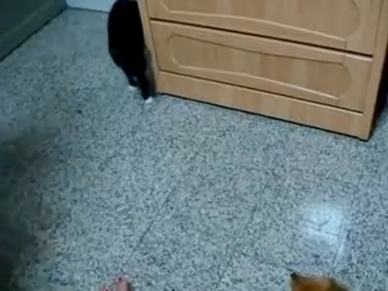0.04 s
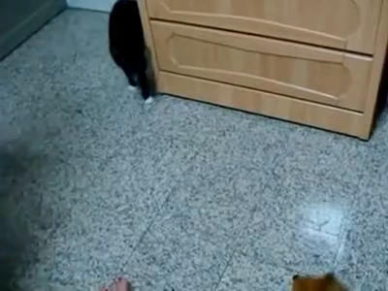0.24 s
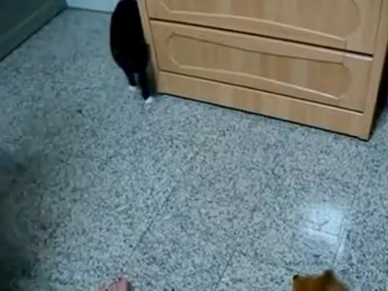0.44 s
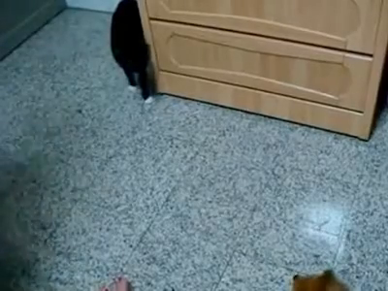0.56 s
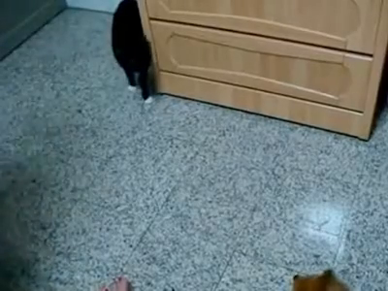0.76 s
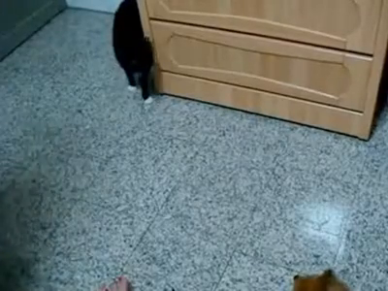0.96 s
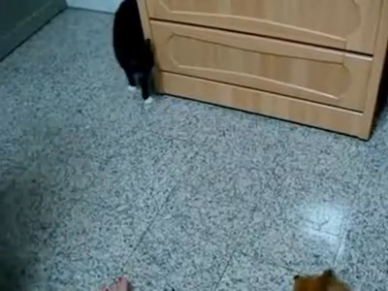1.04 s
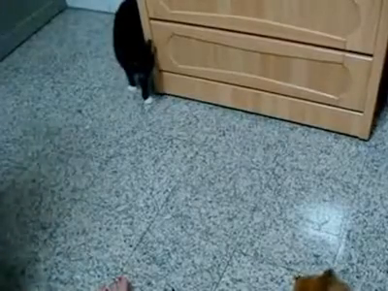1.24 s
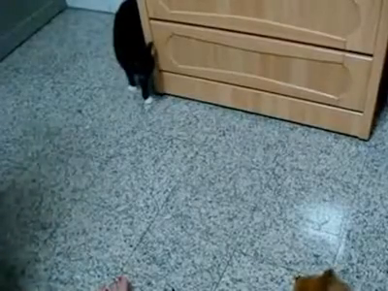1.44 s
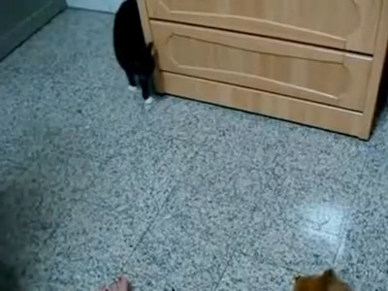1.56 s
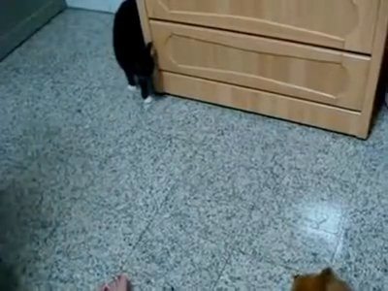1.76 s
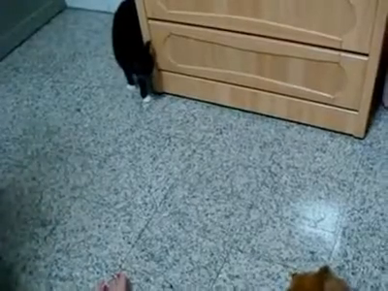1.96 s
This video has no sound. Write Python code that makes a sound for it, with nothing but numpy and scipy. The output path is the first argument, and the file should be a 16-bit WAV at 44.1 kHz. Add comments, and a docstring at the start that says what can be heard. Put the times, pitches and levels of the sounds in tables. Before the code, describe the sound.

One sharp, raspy bark from a small dog indoors, followed by two faint clicks.

```python
"""Dog bark in a stone-floored room

A small dog barks once, close by: the pitch arches up, the voice breaks into a rasp as the mouth
closes, its breath pushes on the microphone and the room rings. An earlier bark is dying away at
the start. Two dry handling clicks ring a small casing, over soft room noise and a low hum."""
import sys
import numpy as np
from scipy import signal
from scipy.fft import rfft, irfft
from scipy.io import wavfile
from scipy.ndimage import uniform_filter1d

SR = 44100
rng = np.random.default_rng(int(sys.argv[2]) if len(sys.argv) > 2 else 0)


def dump_mix(stems):
    """Bounce the given channels to the path in sys.argv[1] as a 16-bit WAV at rate SR."""
    frames = np.atleast_2d(stems).T  # one column per channel
    limited = np.clip(frames, -1, 1)  # hard clip at full scale
    pcm = np.round(limited * 32767).astype(np.int16)
    wavfile.write(sys.argv[1], SR, pcm)


N = 88200
T = np.arange(N) / SR
BIN_HZ = np.fft.rfftfreq(N, 1 / SR)


def amp(db):
    return 10 ** (np.asarray(db) / 20)


def unit(x):
    """Scale to rms 1."""
    return x / np.sqrt(np.mean(x ** 2) + 1e-20)


def steady(x):
    """Hold the 5 ms rms at 1."""
    return x / np.sqrt(abs(uniform_filter1d(x ** 2, 220)) + 1e-12)


def curve(rows, column=1):
    """Table column, linear in time."""
    rows = np.array(rows)
    return np.interp(T, rows[:, 0], rows[:, column])


def at_hz(points, hz):
    """Table value on a log-frequency axis."""
    knots_hz, values = np.transpose(points)
    return np.interp(np.log(hz + 1), np.log(knots_hz + 1), values)


def colour(x, spectrum):
    """Minimum-phase filter with the given spectrum."""
    log_gain = np.log(amp(at_hz(spectrum, abs(np.fft.fftfreq(8192, 1 / SR)))))
    response = np.exp(np.conj(signal.hilbert(log_gain)))
    taps = np.fft.ifft(response).real[:2048]
    return signal.fftconvolve(x, taps)[:N]


def noise(spectrum):
    """Shaped noise, rms 1."""
    return unit(irfft(rfft(rng.standard_normal(N)) * amp(at_hz(spectrum, BIN_HZ)), N))


def wander(cutoff_hz):
    """Low-passed random motion, rms 1."""
    return unit(irfft(rfft(rng.standard_normal(N)) / (1 + (BIN_HZ / cutoff_hz) ** 2) ** 2, N))


def room_noise():
    """Soft hiss, low around the bark, swelling afterwards."""
    # freq_hz, density_db
    spectrum = [(20, -10.5), (60, -13.5), (120, -15.5), (200, -6), (350, -3.5), (600, -3), (1050, 0),
                (1600, -4), (2500, -7.5), (4000, -14.5), (6500, -20), (10000, -25)]
    # time_s, level_db
    envelope = [(0, -48), (.4, -53.5), (.62, -45), (1, -43), (1.35, -40.5), (2, -39.5)]
    return noise(spectrum) * amp(curve(envelope) + .5 * wander(12))


def hum():
    """Low partials, each wavering in level and phase."""
    # freq_hz, relative_db
    partials = [(129, -7.5), (193, -3), (258, -3), (323, -0.5), (581, -3.5)]
    # time_s, level_db
    envelope = [(0, -61), (.6, -69.5), (1.2, -55.5), (1.5, -50.5), (2, -47.5)]
    tone = np.zeros(N)
    for hz, db in partials:
        phase = 2 * np.pi * hz * T
        tone += amp(db) * (wander(2.2) * np.cos(phase) + wander(5.1) * np.sin(phase))
    return unit(tone) * amp(curve(envelope))


def handling_clicks():
    """Each snap and its quick bounces ring a hand-held casing."""
    # start_s, gain_db, tilt_db_per_octave
    snaps = [(0.8913, -24.5, 1), (1.2835, -24.5, -2.3)]
    # freq_hz, gain_db, t60_s
    casing_modes = [(500, 3, 0.015), (783, -0.5, 0.024), (1026, 1.5, 0.012), (2054, -2, 0.018),
                    (2790, -2, 0.017), (3120, 0, 0.012), (4600, -5, 0.0073), (7280, -6, .007),
                    (8800, -9, 0.0025)]
    # delay_s, gain
    bounces = [(0, 0.85), (.0012, 0.39), (.0031, .2), (.0047, -0.29)]
    out = np.zeros(N)
    t = T[:SR // 10]
    for start_s, snap_db, tilt in snaps:
        ring = np.zeros(len(t))
        for k, (hz, mode_db, t60_s) in enumerate(casing_modes):
            decay = amp(mode_db + tilt * np.log2(hz / 1000) - 60 * t / t60_s)
            ring += (-1) ** k * decay * np.sin(2 * np.pi * hz * t)
        for delay_s, gain in bounces:
            out[round((start_s + delay_s) * SR):][:len(t)] += amp(snap_db) * gain * ring
    return signal.sosfilt(signal.butter(2, 370, "high", fs=SR, output="sos"), out)


def earlier_bark():
    """Room tail of a previous bark, as fading noise."""
    # freq_hz, density_db
    spectrum = [(200, -34), (600, -36), (760, -6.5), (900, -22), (1100, -7), (1450, -5), (1650, -7),
                (2000, -24), (4000, -33.5), (9000, -43)]
    # time_s, level_db
    envelope = [(0, -33.5), (.07, -35), (.085, -39.5), (.17, -39), (.3, -73)]
    return noise(spectrum) * amp(curve(envelope)) * (T < envelope[-1][0])


def room(x):
    """Direct sound, floor and furniture echoes, diffuse tail and lingering modes."""
    # freq_hz, t60_s
    decay_times = [(200, 0.98), (900, 0.96), (1500, 0.75), (2500, 0.59), (4000, 0.59), (9000, 0.65)]
    # freq_hz, gain_db, t60_s
    modes = [(968, -56.5, 0.88), (1280, -51, 0.53), (1433, -67.5, 1.12), (1476, -69.5, 0.97),
             (1676, -72, 0.71)]
    # delay_s, gain
    echoes = [(.0042, 0.23), (.0115, 0.14), (.019, -0.06), (.028, -0.22)]
    tail_db, build_s = -5.5, .016
    band_hz, frame_s, bands = signal.stft(rng.standard_normal(N), SR, nperseg=256)
    decay = amp(-60 * frame_s / at_hz(decay_times, band_hz)[:, None])
    tail = signal.istft(bands * decay, SR)[1][:N] * np.minimum(T / build_s, 1)
    response = amp(tail_db) * tail / np.linalg.norm(tail)
    for hz, db, t60_s in modes:
        response += amp(db - 60 * T / t60_s) * np.cos(2 * np.pi * (hz * T + rng.random()))
    response[0] += 1
    for delay_s, gain in echoes:
        response[round(delay_s * SR)] += gain
    return signal.fftconvolve(x, response)[:N]


def breath_thump():
    """Air from the bark pushes on the microphone."""
    # time_s, level_db
    envelope = [(.19, -94), (.22, -45), (.265, -36), (.285, -56), (.45, -63.5)]
    return wander(40.5) * amp(curve(envelope))


def vocal_folds(pitch_hz, roughness):
    """Jittering pulses and air puffs; as the voice breaks, a slower tissue flap beats against them."""
    jitter, puff_cycles = .13, .32
    break_span_s, break_depth, flap_ratio, drift_rad = [.219, .243], .9, .31, .61
    jittered_hz = pitch_hz * (1 + jitter * roughness * wander(451.7))
    cycles = np.cumsum(jittered_hz) / SR
    pulses = sum(np.cos(2 * np.pi * k * cycles) for k in range(1, 21))
    flap = np.cos(2 * np.pi * flap_ratio * cycles + drift_rad * wander(60))
    pulses *= 1 + np.interp(T, break_span_s, [0, break_depth]) * flap
    puffs = np.exp(-(cycles % 1) / puff_cycles) * rng.standard_normal(N)
    return (1 - roughness) * unit(pulses) + roughness * unit(puffs)


def throat(drive):
    """Resonances shift as the lips part, the mouth snaps open, then nearly shuts."""
    # each: freq_hz, gain_db
    lips_parting = [(150, -42), (350, -4), (520, -15), (850, -12), (1250, 3), (1500, 3.5), (2000, -18.5),
                    (3000, -16), (4200, -16.5), (6500, -36), (10000, -39)]
    mouth_open = [(150, -52), (400, -57), (560, -11.5), (730, -20), (950, -23), (1280, 0), (1470, 0),
                  (1800, -4), (2100, -8), (2450, -22.5), (2900, -12), (3250, -16.5), (3650, -11),
                  (4500, -22.5), (6200, -26), (7800, -45), (10000, -47.5)]
    nearly_shut = [(150, -50), (500, -43.5), (750, -9), (960, -2), (1130, -7.5), (1400, -8.5), (1680, 0),
                   (1950, -6.5), (2450, -19), (3700, -25), (4600, -34), (6800, -27.5), (8000, -37.5),
                   (10000, -37.5)]
    opening_s, closing_s = [.1988, .209], [.242, .2844]
    parting = np.interp(T, opening_s, [1, 0])
    shut = np.interp(T, closing_s, [0, 1])
    return (parting * colour(drive, lips_parting)
            + (1 - parting - shut) * colour(drive, mouth_open)
            + shut * colour(drive, nearly_shut))


def bark():
    """Vocal folds drive the throat; the level flutters more as the voice roughens."""
    # time_s, pitch_hz, level_db, roughness
    gesture = [(.18, 335, -54, 0.07), (.192, 432.7, -19, 0.3), (.204, 616.5, -14, .32),
               (.217, 714.8, -7, .2), (.232, 747.6, -10.5, .25), (.252, 727.1, -8, .45),
               (.27, 650, -14.5, .55), (.29, 555.3, -13, .68), (.312, 475.3, -11.5, .65),
               (.335, 458.4, -17, 0.62), (.355, 446, -28, 0.5)]
    roughness = curve(gesture, 3)
    voice = throat(vocal_folds(curve(gesture, 1), roughness))
    shimmer_db = 2 * roughness * wander(400)
    gate = (T > gesture[0][0]) * (T < gesture[-1][0])
    return steady(voice) * amp(curve(gesture, 2) + shimmer_db) * gate


def scene():
    dog = breath_thump() + room(bark()) + earlier_bark()
    return (dog + handling_clicks() + hum() + room_noise())[None]


def record(dry):
    """Soft overload on the peaks, then a low-pass."""
    ceiling, cutoff_hz = 1.07, 10080
    limited = dry / (1 + (dry / ceiling) ** 4) ** .25
    taps = signal.firwin(511, cutoff_hz, window=("kaiser", 8), fs=SR)
    return signal.oaconvolve(limited, taps[None], "same")


dry = scene()
out = record(dry)
dump_mix(out)
```